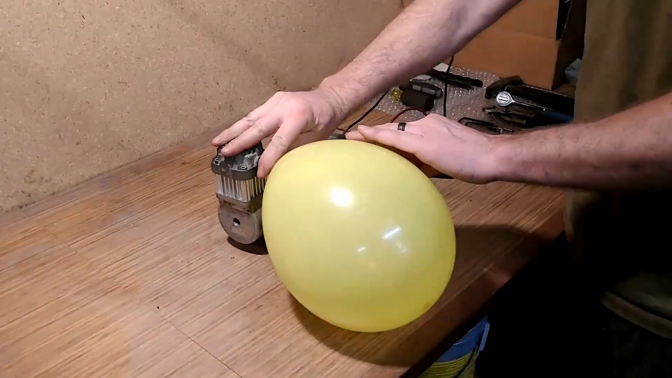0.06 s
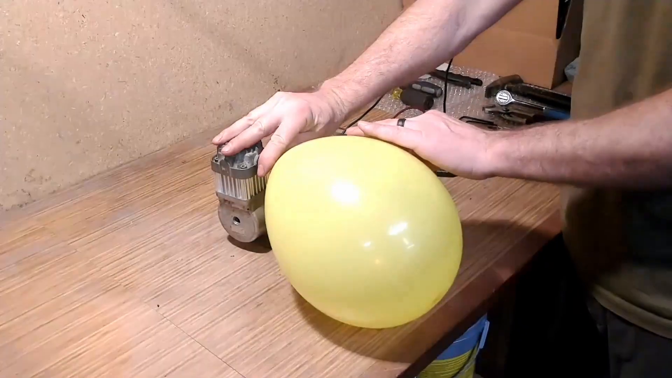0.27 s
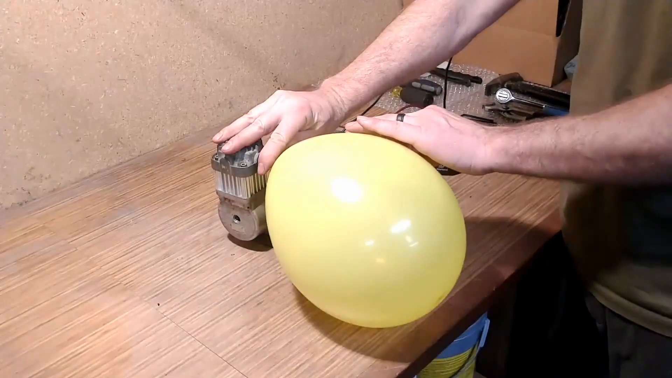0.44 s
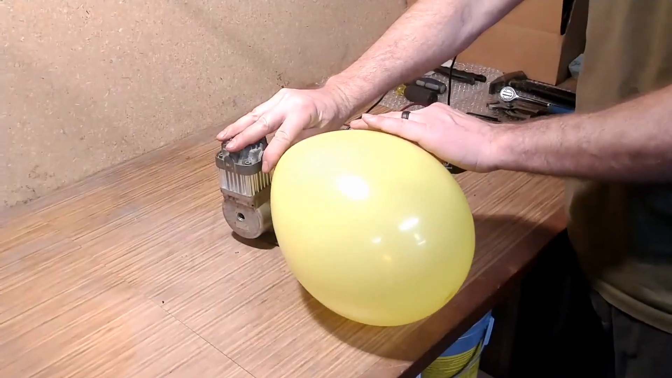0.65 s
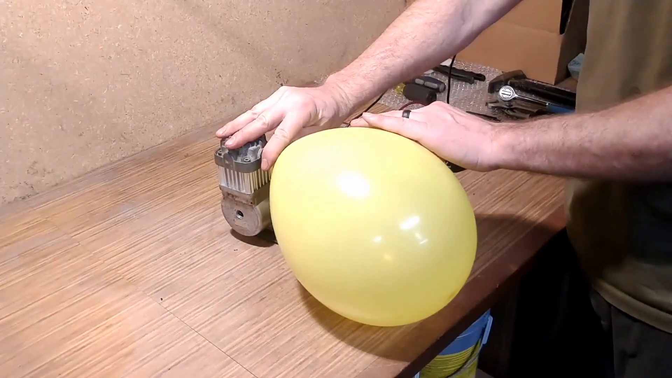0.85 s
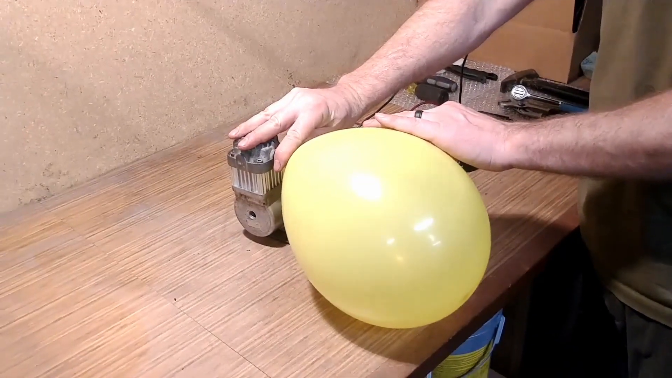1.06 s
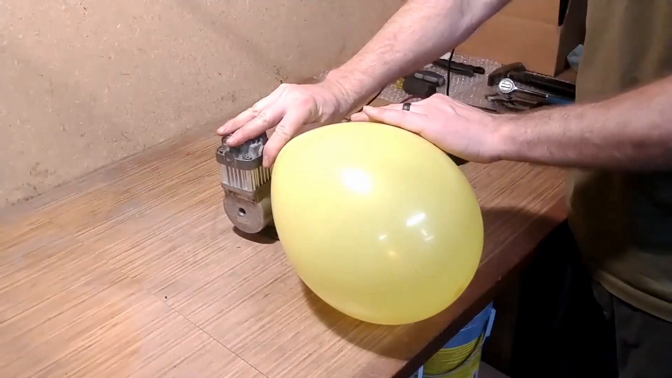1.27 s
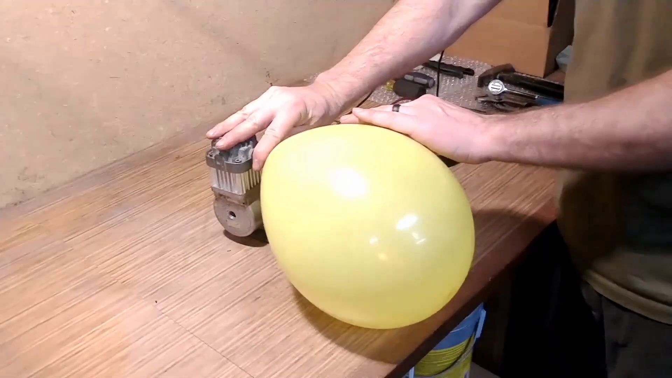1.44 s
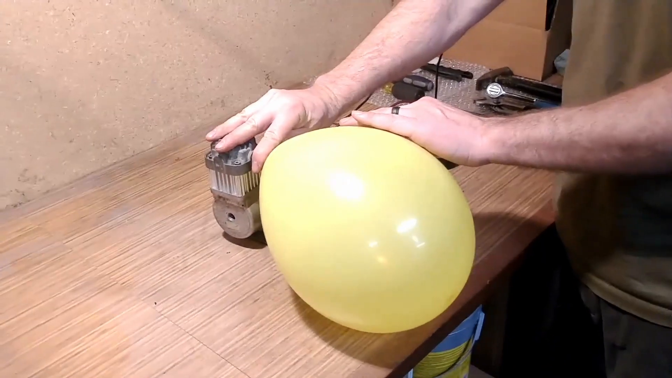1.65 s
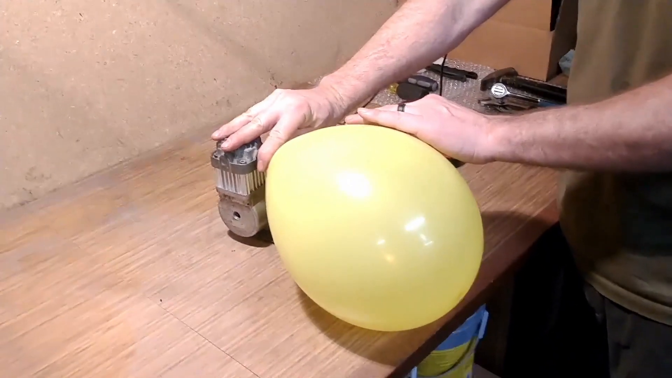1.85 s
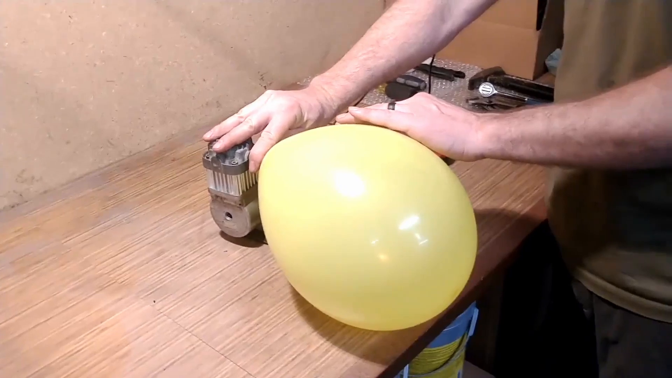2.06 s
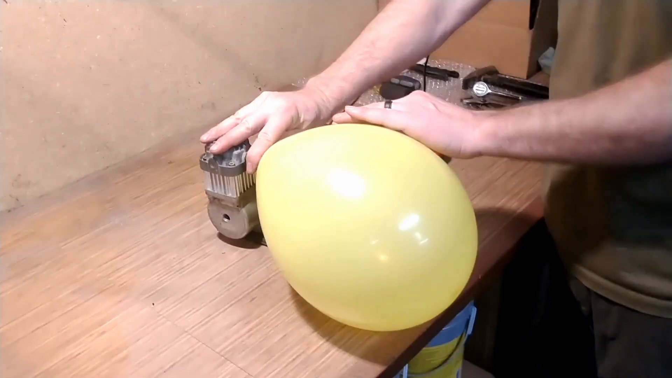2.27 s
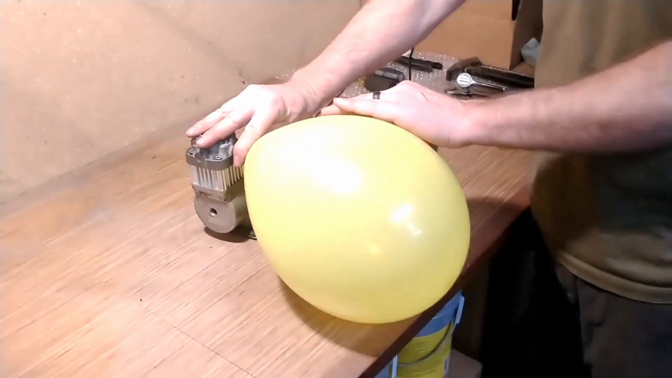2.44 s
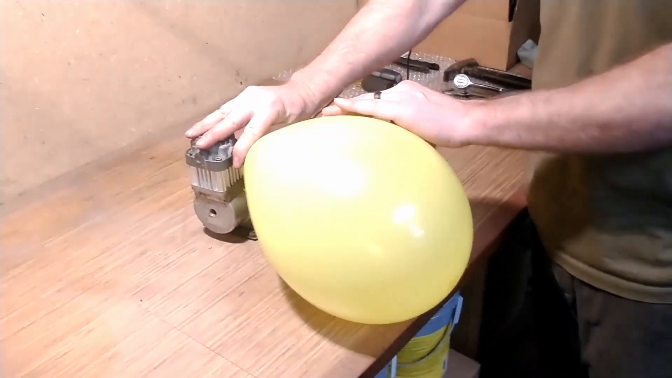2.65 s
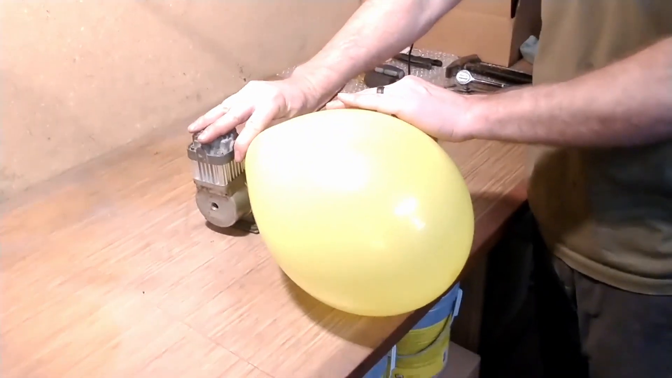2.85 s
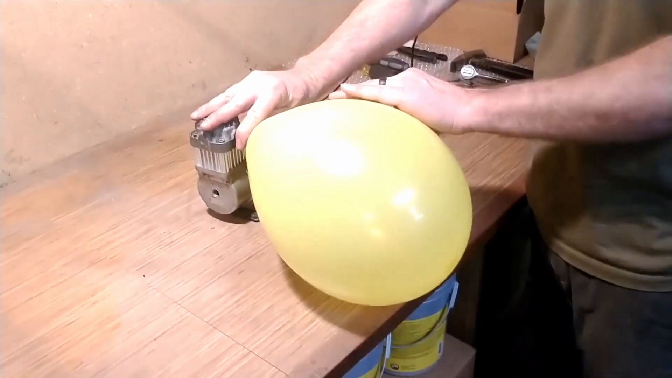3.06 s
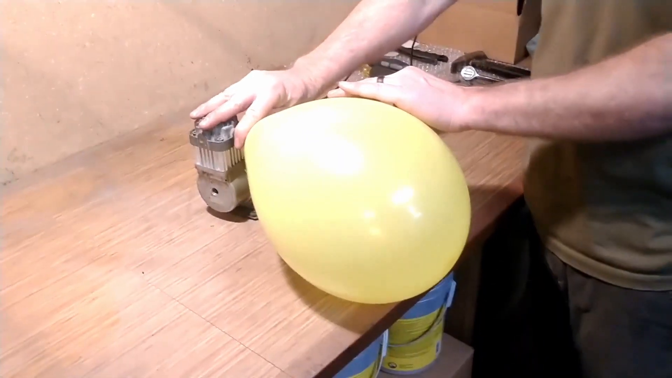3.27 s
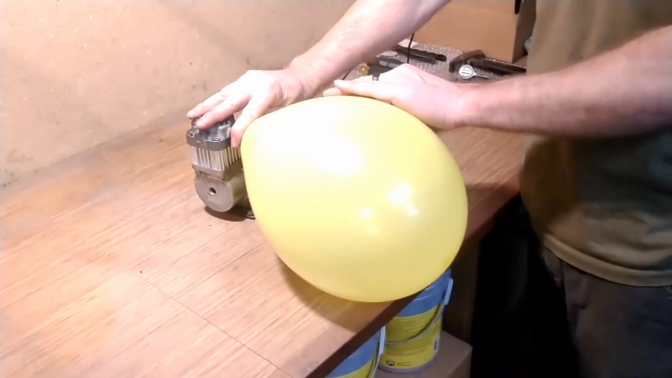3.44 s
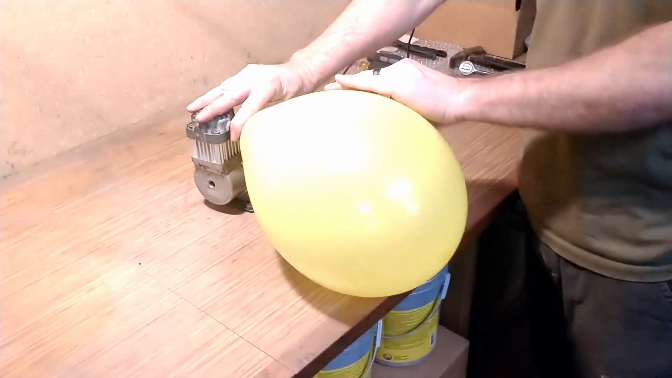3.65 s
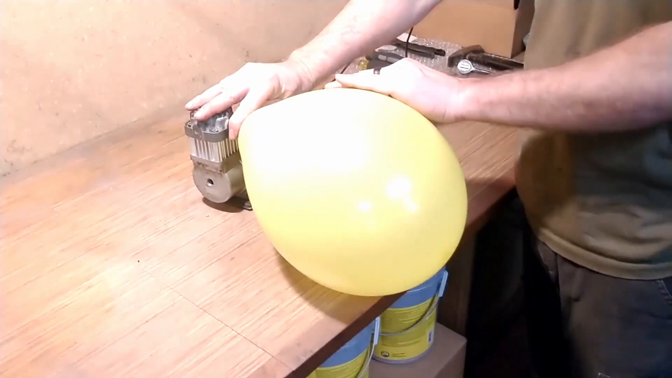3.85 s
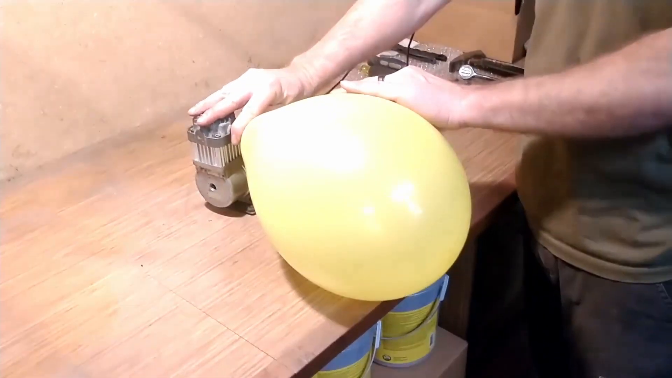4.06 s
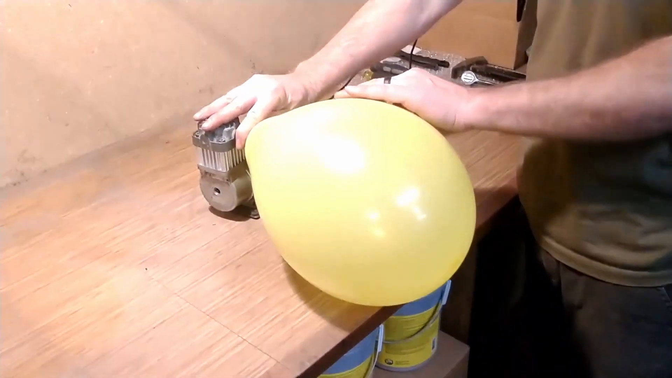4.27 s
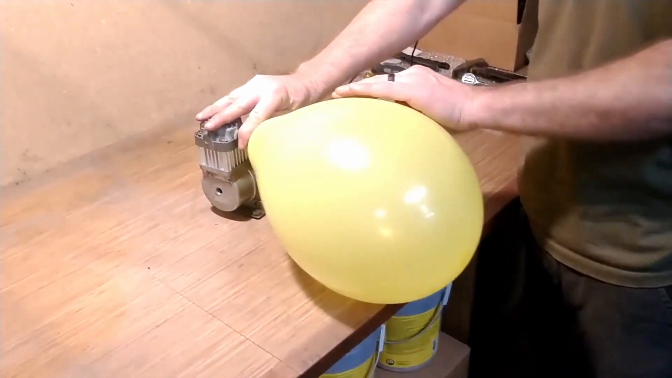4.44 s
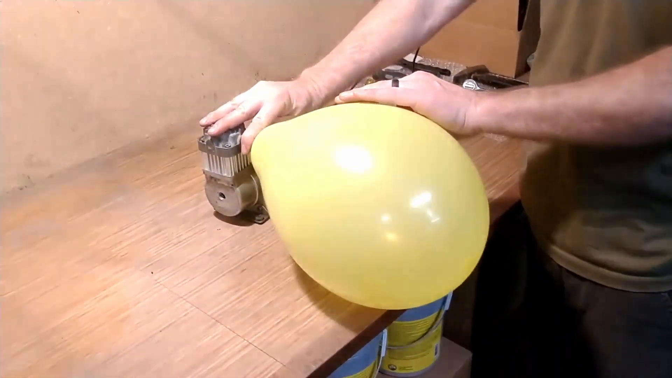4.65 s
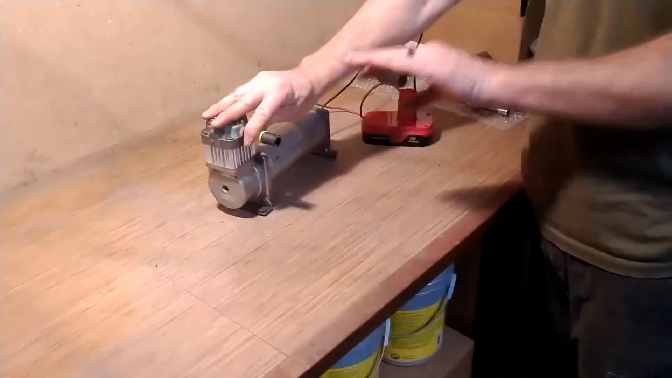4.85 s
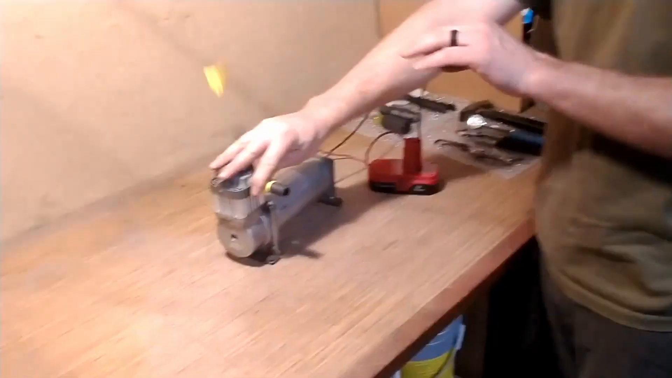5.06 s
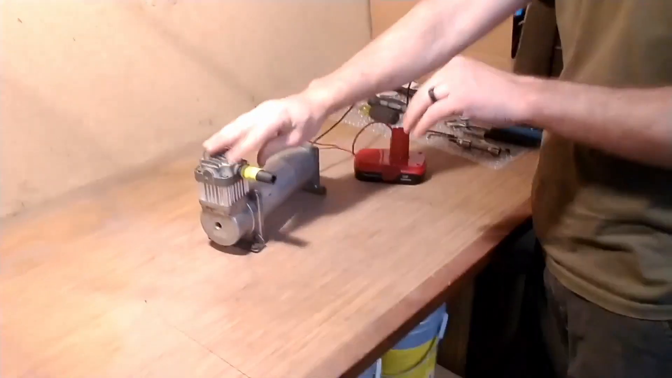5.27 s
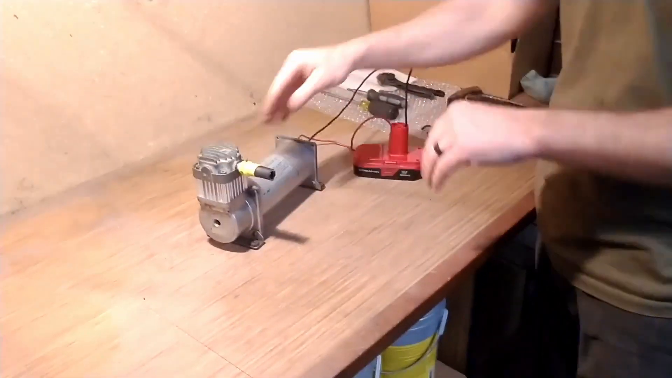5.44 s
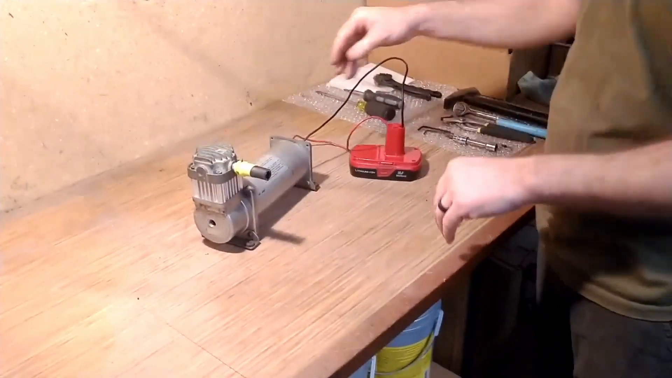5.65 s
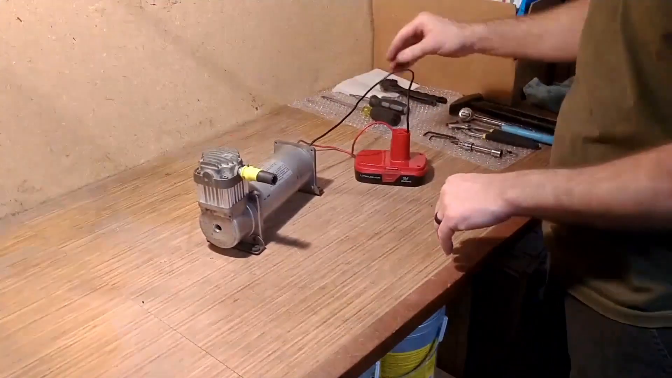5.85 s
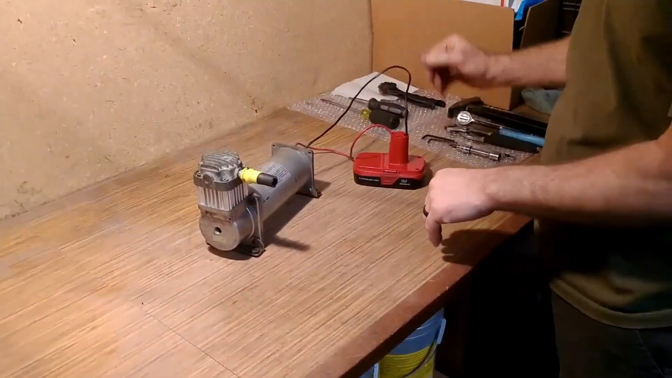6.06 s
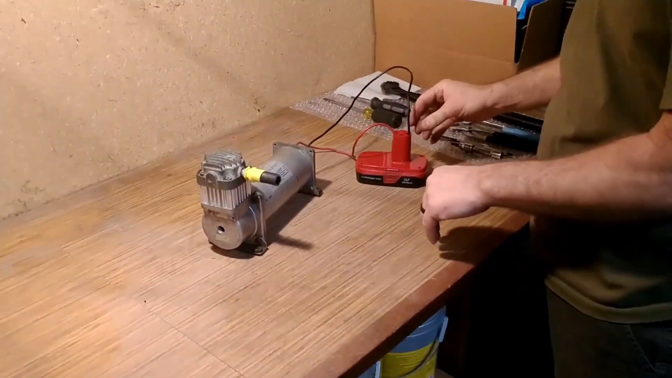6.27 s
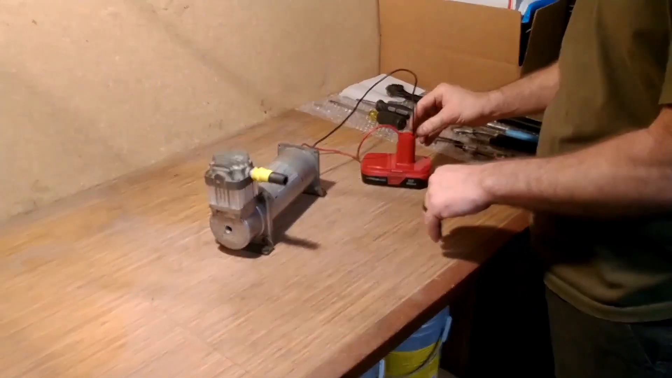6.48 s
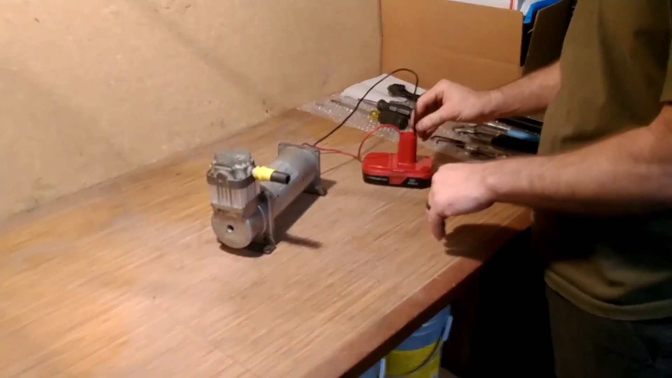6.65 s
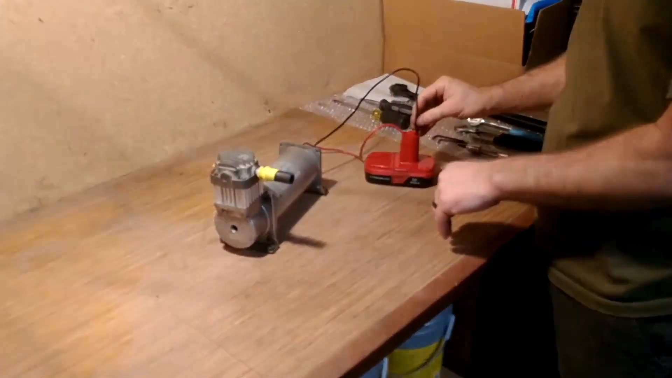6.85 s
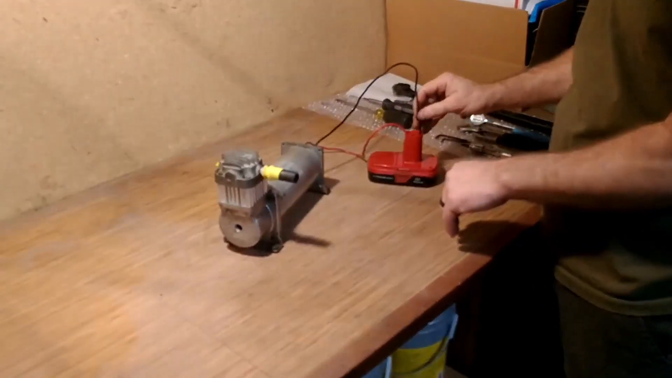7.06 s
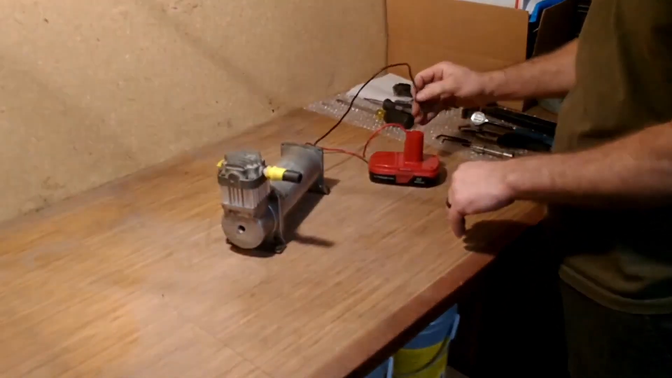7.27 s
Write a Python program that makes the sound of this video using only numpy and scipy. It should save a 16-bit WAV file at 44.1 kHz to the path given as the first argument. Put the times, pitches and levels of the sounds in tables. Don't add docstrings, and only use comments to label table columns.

```python
import sys
import numpy as np
from scipy import signal
from scipy.fft import rfft, irfft, next_fast_len
from scipy.io import wavfile
from scipy.ndimage import uniform_filter1d

SR = 44100
rng = np.random.default_rng(int(sys.argv[2]) if len(sys.argv) > 2 else 0)


def store_pcm(level_fs):
    pcm = np.round(np.clip(level_fs, -1, 1) * 32767).astype(np.int16)
    wavfile.write(sys.argv[1], SR, np.atleast_2d(pcm).T)


def gain_from_db(level_db):
    decades = np.asarray(level_db, float) / 20
    return 10 ** decades


N = 322371

BURST_S = 4.8305
STOP_S = 7.17
OPEN_SHIFT = 0.99
# [t/s, speed/(strokes per s)]
SPEED = [(0, 63.263), (.45, 63.24), (4.5, 62.683), (4.95, 62.73), (6.3, 62.378), (7.17, 62.459)]
# [t/s, level over the usual slap/dB]
HARD = [(.510, 4), (1.032, 1), (1.064, 4), (1.223, 3), (1.413, 4.5), (1.636, 8), (1.904, 5), (2.031, 7.5),
        (2.206, 5), (2.237, 7), (2.285, 7), (2.301, 3), (2.428, 7.5), (2.587, 4), (2.762, 6), (3.223, 7),
        (3.429, 8), (3.700, 7.5), (3.716, 7), (3.859, 6), (4.019, 2.5), (4.242, 5.5), (5.247, 9),
        (5.327, 5), (5.486, 7), (6.110, 4), (6.174, 2), (6.383, 3), (6.543, 3), (7.135, 5)]
# [f/Hz, phase by which the right port leads/rad]
HUM_LEAD = [(60, 1.46), (190, 0.91), (260, 1.34), (380, -0.69), (500, 1.72), (570, 1.33), (690, 0.67),
            (820, -0.25), (1200, 0.76), (1750, -1.87)]
# [f/Hz, level/dB]
LEFT_DB = [(60, 9), (110, 9), (200, 6.5), (380, 3.5), (700, 4.5), (1290, -3), (1900, 0), (4500, 0),
           (8100, 1.5), (15000, -.5)]


def evened(x):
    return x / np.sqrt(np.mean(x ** 2) + 1e-20)


def read(points, hz):
    f, value = np.transpose(points)
    return np.interp(np.log(hz + 1), np.log(f + 1), value)


def curve(rows):
    s, *columns = np.transpose(rows)
    return [np.interp(np.arange(N) / SR, s, c) for c in columns]


def shaped(x, response):
    size = next_fast_len(N + SR // 4)
    return irfft(rfft(x, size) * response(np.fft.rfftfreq(size, 1 / SR)), size)[..., :N]


def modes(table, hz):
    each = [gain_from_db(db) / (1 + 2j * (hz - f) / width) for f, width, db in table]
    power = sum(abs(e) ** 2 for e in each)
    return np.sqrt(power) * np.exp(1j * np.angle(sum(each)))


def puff(turns, start, rise, fall, rest_db):
    u = (turns - start) % 1
    return (1 - np.exp(-(u / rise) ** 2)) * np.exp(-u / fall), gain_from_db(rest_db)


def habitual(turns, same):
    place = (turns % 1 * 700).astype(int)
    habit = rng.standard_normal((2, 700))[:, place]
    return same * habit + np.sqrt(1 - min(same, 1) ** 2) * rng.standard_normal((2, N))


def mottled(x, depth_db, wide, long):
    z = signal.stft(x, nperseg=256, noverlap=128)[2]
    patches = uniform_filter1d(rng.standard_normal(z.shape), round(wide), 1)
    patches = uniform_filter1d(patches, round(long), 2)
    return signal.istft(z * gain_from_db(depth_db * evened(patches)), nperseg=256, noverlap=128)[1][:, :N]


def lateness(hz):
    # [f/Hz, lag/turns]
    late_turns = [(1200, .5), (2240, 1), (3260, 1.5), (4080, 2), (5000, 2.4), (7000, 2.9), (7400, 3.3),
                  (9250, 4)]
    port_late_s, dwell, dwell_hz = .000423, .85, 4500
    turns = np.interp(hz, *np.transpose(late_turns))
    turns = turns + port_late_s * np.maximum(hz - late_turns[-1][0], 0)
    return turns - dwell * (hz < dwell_hz) * np.sin(4 * np.pi * turns) / (4 * np.pi)


def ports(near, far):
    # [f/Hz, share]
    far_share = [(100, 0.1), (4300, 0.91), (5200, 0.82), (8500, 0.97), (12000, 1), (16000, 0.93)]
    # [f/Hz, share]
    copy_share = [(100, 0.33), (2200, 0.93), (3200, 0.42), (4200, 0.59), (5200, 0.31), (7100, 0.23),
                  (9000, 0.48), (16000, 0.82)]
    size = next_fast_len(N + SR // 4)
    hz = np.fft.rfftfreq(size, 1 / SR)
    late = np.clip(read(copy_share, hz), 0, 1) * np.exp(-2j * np.pi * lateness(hz))
    left_tilt = gain_from_db(read(LEFT_DB, hz) / 2) / np.sqrt(1 + abs(late) ** 2)
    right_tilt = left_tilt / gain_from_db(read(LEFT_DB, hz))
    near = rfft(near, size)
    far = rfft(far, size) * read(far_share, hz)
    return irfft([(near - late * far) * left_tilt, (far - late * near) * right_tilt], size)[:, :N]


def hops(turns, level_db):
    # [f/Hz, width/Hz, level/dB]
    bench = [(95, 11.6, 3.5), (183.3, 27, 1), (220, 21, -11)]
    # [t/s, scatter/strokes]
    loose = [(5.0, .5), (5.75, .3), (5.9, .02), (7.18, .02), (7.24, .4)]
    landing_s = 6.431
    stir_s, let_go_s, lift_s, held_db = 5.06, 5, 0.065, -14
    strokes = turns - turns[round(landing_s * SR)]
    hop = np.round(strokes / 3).astype(int)
    scatter = rng.uniform(-1.1, 1, hop.max() - hop.min() + 1)
    early = scatter[hop - hop.min()] * curve(loose)[0]
    landed = strokes + early >= 3 * hop
    landings = (np.diff(landed.astype(int), prepend=1) > 0) * gain_from_db(0.28 * rng.standard_normal(N))

    def wood(hz):
        return modes(bench, hz) / (1 + (hz / 330) ** 4) / (1 + (70 / (hz + 1)) ** 4)

    left = evened(shaped(landings, wood))
    right = shaped(left, lambda hz: np.exp(1j * read(HUM_LEAD, hz)))
    t = np.arange(N) / SR
    hand_db = held_db * np.clip((let_go_s - t) / lift_s + .5, 0, 1)
    stir = np.clip((t - stir_s) / lift_s + .5, 0, 1)
    return gain_from_db(level_db + hand_db) * stir * np.array([left, right]) * gain_from_db([[4.5], [-3.5]])


def hum(turns, level_db):
    # [multiple, balloon small/dB, balloon full/dB, outlet open/dB]
    orders = [(0.993, -20.5, -21, -26), (1.993, -8, -9, -6), (3, -7.5, -8, -5.5), (3.988, -10, -11.5, -14),
              (5.001, -1, -0.5, -1.5), (6, -8.5, -10.5, -10.5), (7.034, -9.5, -12.5, -12),
              (8, -11.5, -6.5, -5.5), (9.02, -9.5, -8.5, -8.5), (10.026, -6, -5.5, -8),
              (11.007, -10.5, -12, -14.5), (13, -11.5, -20.5, -18.5), (14, -13, -16.5, -17),
              (15, -18, -15.5, -10), (16.02, -37, -16.5, -11.5), (17, -37, -22, -22.5),
              (18.95, -19.5, -12.5, -13.5), (21, -25, -28, -31), (21.96, -22, -15, -16.5),
              (23, -27, -31, -30), (24, -27, -32, -26), (26.25, -20, -17, -12.5), (27, -41, -11.5, -15.5),
              (28.05, -6.5, -8, -7.5), (28.8, -52, -40, -28), (30.15, -17.5, -11, -47)]
    out = np.zeros((2, N))
    steps = np.arange(0, N + 512, 512)
    shudder = 1.4 * np.clip((steps / SR - STOP_S) / 0.034, 0, 1)
    for multiple, small_db, full_db, open_db in orders:
        k = round(multiple)
        waver_db = 0.51 * evened(uniform_filter1d(rng.standard_normal(len(steps)), size=12))
        filling_db = np.interp(steps / SR, [.8, 4.0], [small_db, full_db])
        db = np.where(steps < BURST_S * SR, filling_db, open_db) + waver_db
        size = np.sqrt(2) * np.interp(np.arange(N), steps, gain_from_db(db))
        slip = np.interp(np.arange(N), steps, shudder * rng.standard_normal(len(steps)))
        lag = 4.9 * np.tanh((k - 1.2) / 3) - 1.1 + .57 * max(k - 11, 0) ** 2
        lag += 5.1 * (k - 5.5) * np.exp(-2 * (k - 5.5) ** 2)
        angle = 2 * np.pi * k * turns - lag + slip
        hz = k * SPEED[0][1]
        half_tilt = gain_from_db(read(LEFT_DB, hz) / 2)
        out[0] += size * half_tilt * np.cos(angle)
        out[1] += size / half_tilt * np.cos(angle + read(HUM_LEAD, hz))
    return gain_from_db(level_db + 1.88) * out


def casing(turns, level_db, start=0.29, same=0.43):
    # [f/Hz, width/Hz, level/dB]
    casing_modes = [(2919, 49.6, 2), (2730, 400, -10), (3587, 21, -3)]
    stroke = np.floor(turns - start).astype(int) + 1
    force = gain_from_db(2.0 * rng.standard_normal(stroke.max() + 1))
    gasp, rest = puff(turns, start, rise=0.14, fall=0.13, rest_db=-23.0)
    drive = (gasp * force[stroke] + rest) * habitual(turns, same)
    return gain_from_db(level_db + 4.0) * evened(shaped(drive, lambda hz: modes(casing_modes, hz)))


def pings(turns, level_db, start=.16):
    ping_hz, rise_s, fall_s, ping_db = 4872, 0.0037, 0.003, 12
    spread_db, hard_ping = 4, 2.1
    at = np.flatnonzero(np.diff(np.floor(turns - start)))
    force, phase, apart, pitch = rng.standard_normal((len(at), 4)).T
    force_db = spread_db * np.clip(force, -3, 1)
    for s, db in HARD:
        force_db[np.argmin(abs(at - s * SR))] = hard_ping * db
    t = np.arange(800) / SR
    shape = (1 - np.exp(-(t / rise_s) ** 2)) * np.exp(-t / fall_s)
    port_phase = 3j * phase + .5j * apart * np.array([[1], [-1]])
    size = gain_from_db(level_db[at] + force_db + ping_db) * np.exp(port_phase)
    hz = ping_hz * (1 + .015 * pitch) * np.where(at > BURST_S * SR, OPEN_SHIFT, 1)
    ring = (size[..., None] * shape * np.exp(2j * np.pi * hz[:, None] * t)).real
    out = np.zeros((2, N + 800))
    for port in range(2):
        np.add.at(out[port], at[:, None] + np.arange(800), ring[port])
    return out[:, :N]


def clatter(turns, level_db, start=0.15, same=0.43):
    # [f/Hz, level/dB per Hz]
    slap_colour = [(40, -58), (100, -35), (300, -5.5), (700, -1.5), (1300, -8.5), (2200, -3.5),
                   (3350, -7.5), (5800, -9), (9000, -6.5), (11200, -8.5), (15000, -2), (22050, -5.5)]
    # [f/Hz, width/Hz, level/dB]
    head = [(1875, 100, 4), (4830, 250, 11), (5600, 520, -24), (6780, 780, 1.5), (7870, 480, 0.5),
            (10140, 1300, -5), (11740, 270, -0.5), (13140, 700, 1)]
    stroke = np.floor(turns - start).astype(int) + 1
    force_db = 1.2 * rng.standard_normal(stroke.max() + 1) - 1.5
    for s, db in HARD:
        force_db[stroke[round((s + .003) * SR)]] = 0.86 * db - 3.0
    slap, rest = puff(turns, start, rise=0.08, fall=0.14, rest_db=-19)
    drive = (slap * gain_from_db(force_db[stroke]) + rest) * habitual(turns, same) * gain_from_db(level_db)
    shut = np.arange(N) < BURST_S * SR

    def colour(hz):
        ring = modes(head, hz)
        return np.hypot(gain_from_db(read(slap_colour, hz)), abs(ring)) * np.exp(1j * np.angle(ring))

    body = shaped(drive * shut, colour) + shaped(drive * ~shut, lambda hz: colour(hz / OPEN_SHIFT))
    return evened(body) * np.sqrt(np.mean(gain_from_db(level_db + 5.5) ** 2))


def burst():
    # [t after the burst/s, level/dB]
    roar = [(0, -8), (.012, -10), (.03, -9), (.06, -14), (.1, -21), (.15, -28.5), (.2, -33), (.26, -48),
            (.34, -62)]
    # [f/Hz, level/dB per Hz]
    roar_colour = [(40, -39), (150, -4), (400, 4.5), (1000, 4), (1900, -1), (2900, 3), (4000, -5),
                   (8000, -4.5), (12000, -15), (16000, -12)]
    t = np.arange(N) / SR - BURST_S
    u = np.clip(t / np.array([[.00062], [.00046]]), 0, 30)
    blast = 4 * (1 - u ** 2) * np.exp(-u ** 2 / 2) * (t >= 0)
    front, *sides = shaped(rng.standard_normal((3, N)), lambda hz: gain_from_db(read(roar_colour, hz)))
    sides = mottled(np.array(sides), 3.0, wide=5, long=4)
    level_db = np.interp(t, *np.transpose(roar), right=-120)
    onset = np.clip((t - .0007) / .0006, 0, 1)
    return blast + evened(.6 * front + sides) * gain_from_db(level_db) * onset


def scene():
    # [t/s, level/dB]
    pump_level = [
        [(0.0, -19), (2.14, -18), (2.17, -20), (2.3, -16.5), (2.38, -19.5), (3.15, -17), (4.0, -18),
         (4.02, -15.5), (4.8, -19.5)],
        [(5.04, -33), (5.34, -27.5), (5.6, -21.5), (5.68, -22), (5.83, -19), (6.5, -16), (6.91, -20),
         (7.03, -17), (7.2, -18.5)],
    ]
    # [t after the burst/s, level on the pump/dB]
    duck = [
        (0, 0),
        (.015, 2.5),
        (.1, -8.5),
        (.21, -0.5),
    ]
    rundown_s, rundown_per_s, rundown_db_per_s = .05, 4.6, -94
    waver_db, waver_s = 0.57, .04
    t = np.arange(N) / SR
    cut_s = np.maximum(t - STOP_S, 0)
    speed = curve(SPEED)[0] - rundown_per_s * (1 - np.exp(-cut_s / rundown_s))
    turns = np.cumsum(speed) / SR
    pump_db = curve(pump_level[0] + pump_level[1])[0] + np.interp(t - BURST_S, *np.transpose(duck))
    clatter_db = pump_db - 4 + rundown_db_per_s * np.maximum(cut_s - .03, 0)
    knots = np.arange(0, t[-1] + waver_s, waver_s)
    waver = np.interp(t, knots, rng.standard_normal(400)[:len(knots)])
    casing_db = pump_db - 9 + waver_db * waver
    slaps = mottled(clatter(turns, clatter_db), 2.46, wide=7, long=10)
    air = ports(*(slaps + casing(turns, casing_db) + pings(turns, clatter_db)))
    return hum(turns, pump_db - 9) + air + hops(turns, pump_db - 8.5) + burst()


def band_limit(x):
    return signal.sosfilt(signal.butter(12, 15740, fs=SR, output="sos"), x)


def record(dry):
    cut = shaped(dry, lambda hz: (1j * hz / 55) ** 2 / (1 + 1.4j * hz / 55 - (hz / 55) ** 2))
    return band_limit(np.clip(cut, -1, 1))


dry = scene()
out = record(dry)
store_pcm(out)
```